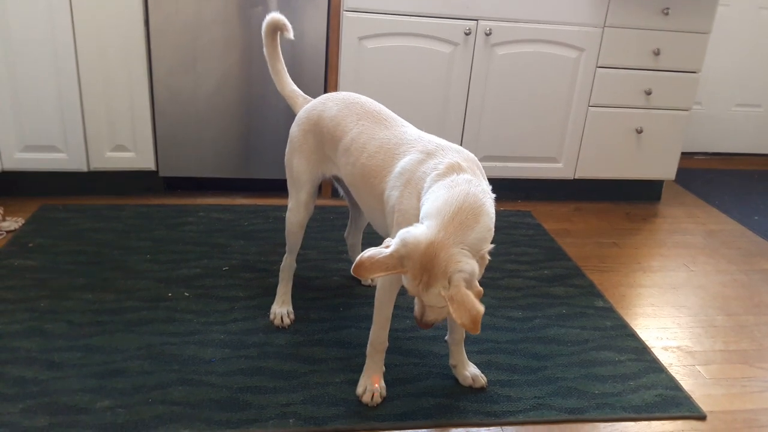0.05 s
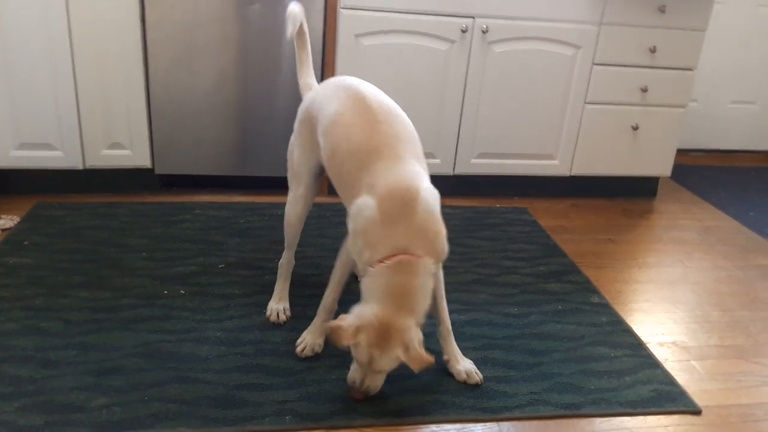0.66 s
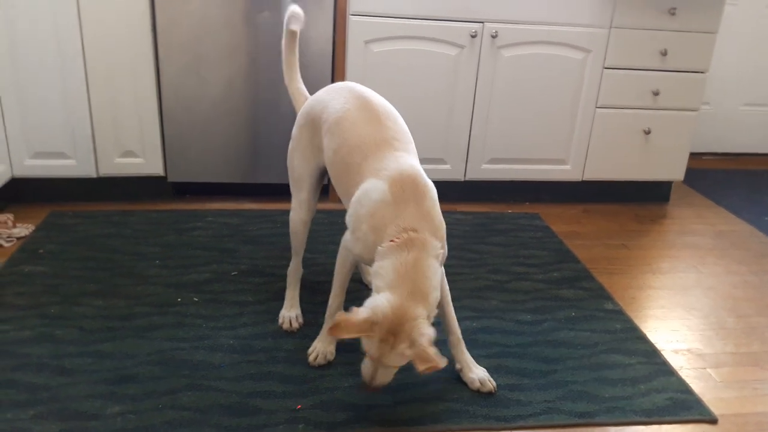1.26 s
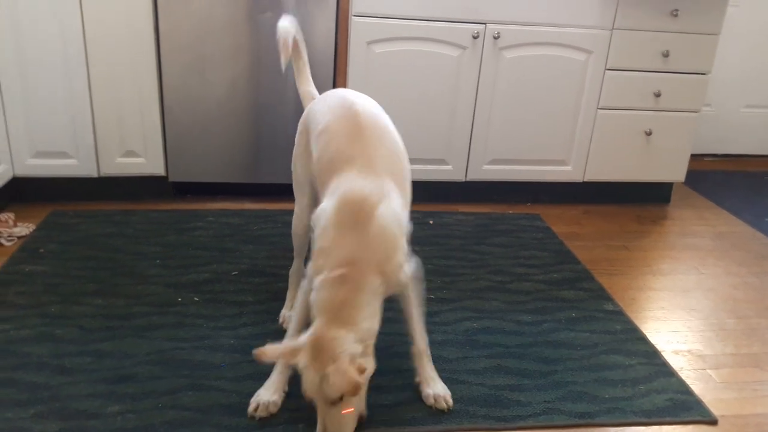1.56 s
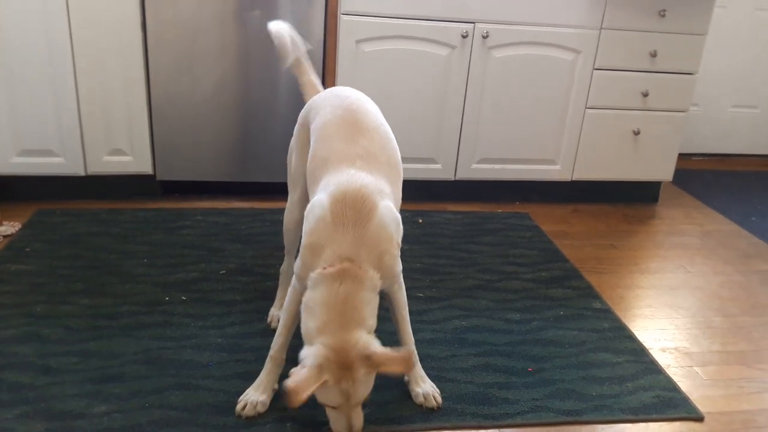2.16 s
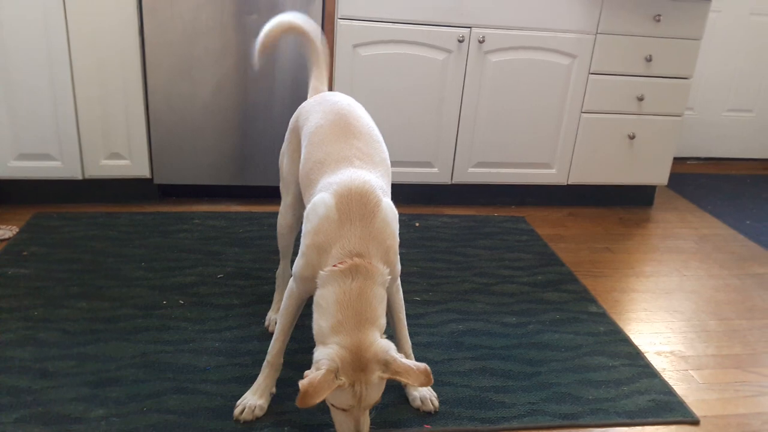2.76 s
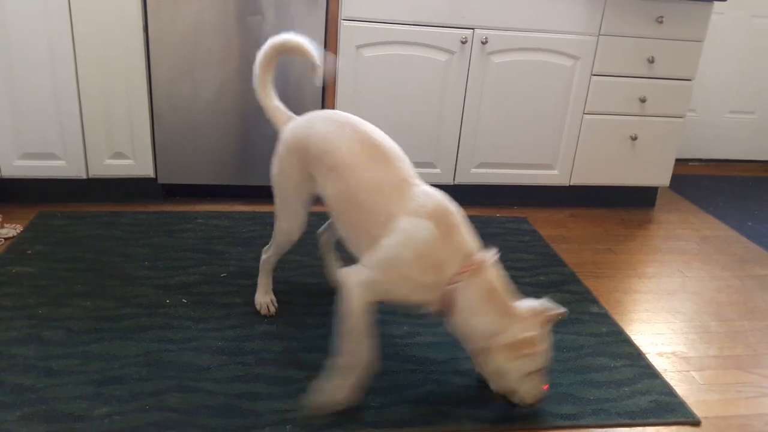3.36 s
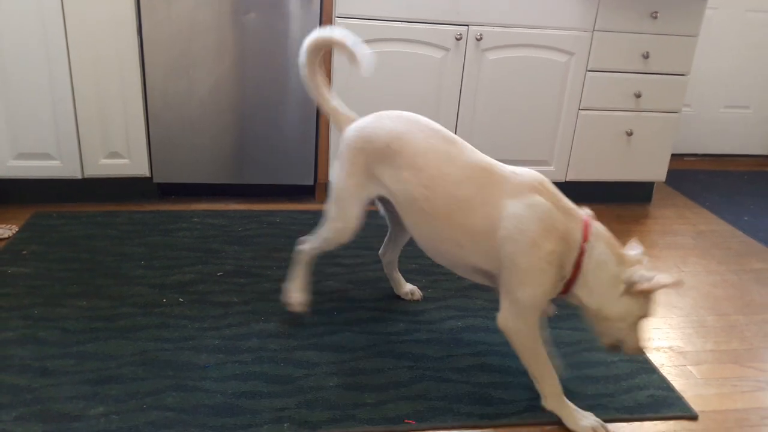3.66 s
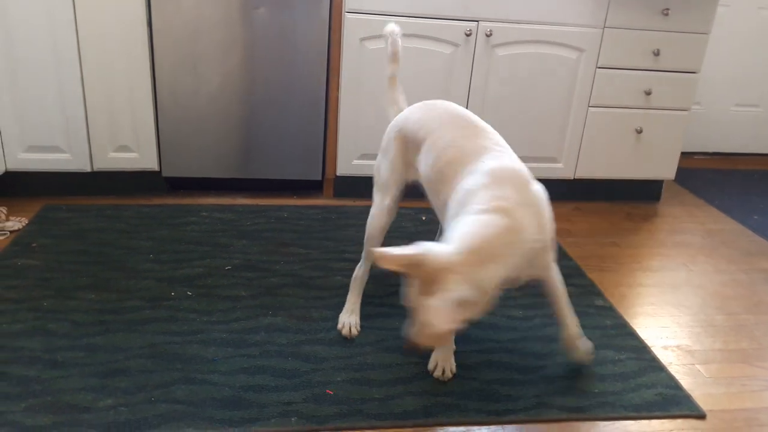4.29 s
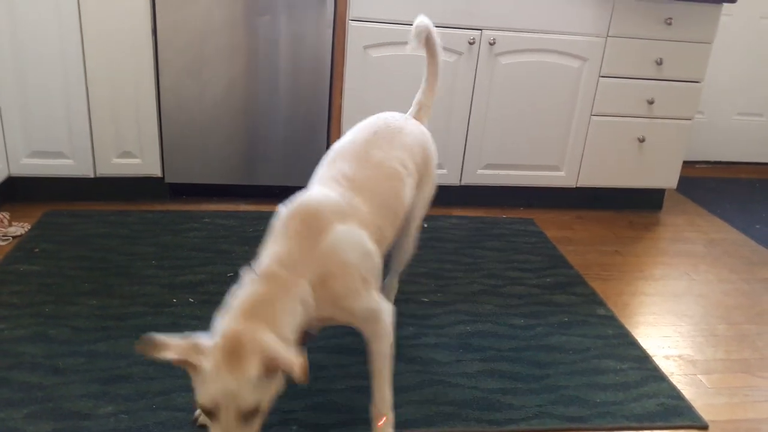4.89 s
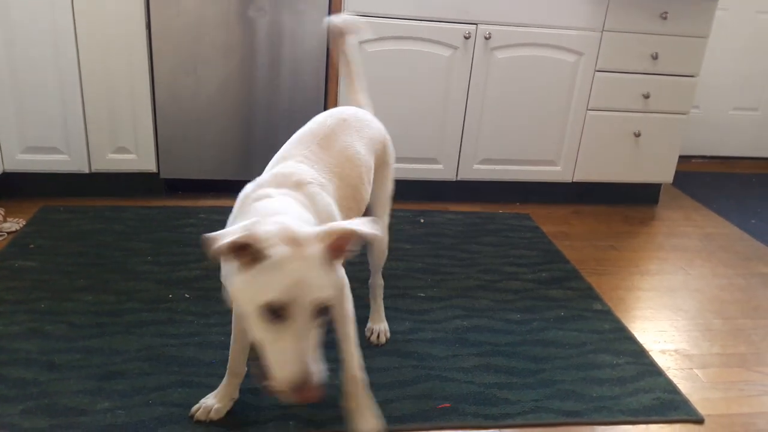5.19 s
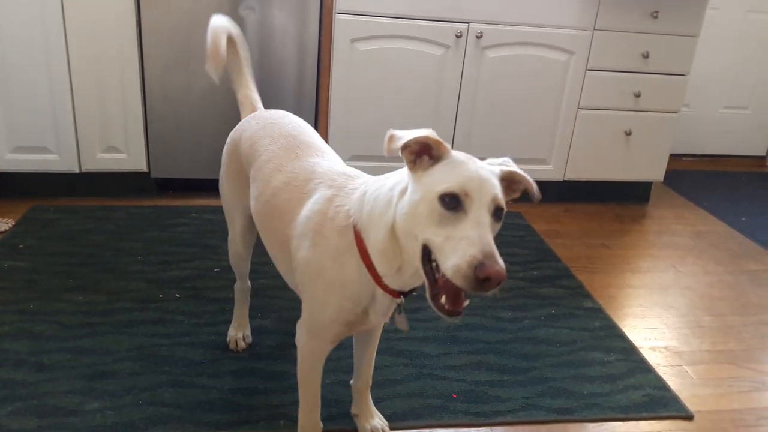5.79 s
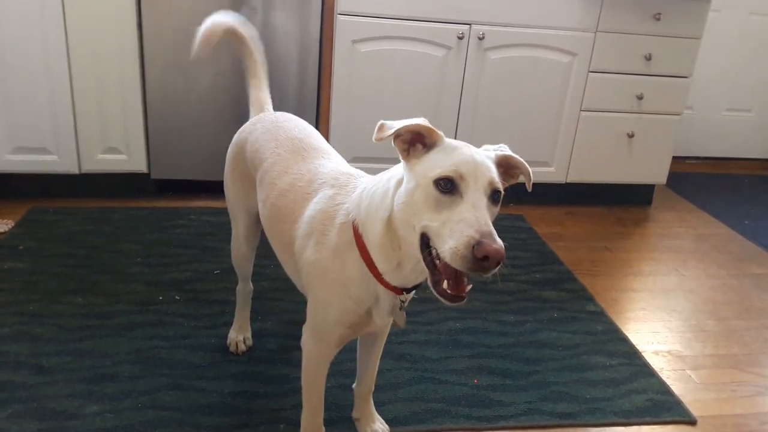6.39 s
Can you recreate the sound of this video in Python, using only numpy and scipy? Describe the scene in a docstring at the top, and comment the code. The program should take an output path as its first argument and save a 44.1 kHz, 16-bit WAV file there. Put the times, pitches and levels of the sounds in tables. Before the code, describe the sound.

A big dog gives two soft, whining woofs and three sharp barks in an echoing kitchen, with paw thumps, skids and claw ticks between.

```python
"""A big dog playing in a kitchen

Two low, whining woofs and three sharp barks: each is one push of breath that buzzes the vocal folds
and rings through the throat. Between them come paw steps, skids, claw ticks, knocks and collar rustles.
Bright crackles and low thumps mark the loudest moments of the last two barks. The hard room rings for
most of a second and a refrigerator hums. The gain control ducks at every bark and creeps back up."""
import sys
import numpy as np
from scipy import signal
from scipy.fft import rfft, irfft
from scipy.io import wavfile
from scipy.ndimage import uniform_filter1d, minimum_filter1d

SR = 44100
rng = np.random.default_rng(int(sys.argv[2]) if len(sys.argv) > 2 else 0)


def file_out(sig):
    """Save sig as 16-bit WAV at sys.argv[1]."""
    # one column per channel
    cols = np.atleast_2d(sig).T
    # limit, then scale
    lim = np.clip(cols, -1, 1)
    pcm = np.round(lim * 32767).astype(np.int16)
    wavfile.write(sys.argv[1], SR, pcm)


N = 284030
TIME = np.arange(N) / SR
CUTOFF_HZ = 15800


def from_db(db):
    """Turn decibels into a number to multiply by."""
    return 10 ** (np.asarray(db) / 20)


def unit_power(x):
    """Scale a sound so that its average power is 1."""
    return x / np.sqrt(np.mean(x ** 2) + 1e-20)


def ramp(x):
    """Keep a share between 0 and 1."""
    return np.clip(x, 0, 1)


def at_hz(points, hz):
    """Read between the rows of a table, giving every octave equal space."""
    points = np.array(points)
    return np.interp(np.log(np.maximum(hz, 1)), np.log(points[:, 0]), points[:, 1])


def colour(x, spectrum, size=2048):
    """Give a sound a tone colour, with a filter that rings only after the sound (minimum phase)."""
    gains = from_db(at_hz(spectrum, np.arange(size // 2 + 1) * SR / size))
    cepstrum = irfft(np.log(gains))
    cepstrum[1:size // 2] *= 2
    cepstrum[size // 2 + 1:] = 0
    response = irfft(np.exp(rfft(cepstrum)))
    return signal.fftconvolve(x, response)[:len(x)]


def noise(spectrum, size):
    """Noise with the given tone colour and a power of 1."""
    return unit_power(colour(rng.standard_normal(size), spectrum))


def wobble(t, per_s):
    """A random wander that glides to per_s new values a second."""
    return np.interp((t - t[0]) * per_s, np.arange(2000), rng.standard_normal(2000))


def swell(t, rise_s, decay_s):
    """A burst builds up to its peak at t = 0 and dies away."""
    below_peak = np.where(t < 0, (t / rise_s) ** 2, t / decay_s)
    return np.exp(-np.minimum(below_peak, 40))


def add(track, start_s, sound):
    """Mix a sound into a track."""
    start = max(int(start_s * SR), 0)
    track[start:start + len(sound)] += sound[:N - start]


def place(x, pan_db, lag_ms):
    """Set the left-right balance: pan_db louder on the left, lag_ms later on the right."""
    delayed = np.interp(TIME - lag_ms / 1000, TIME, x)
    return np.array([x * from_db(pan_db / 2), delayed * from_db(-pan_db / 2)])


# The refrigerator's motor tones. Each row: frequency in Hz, level in dB.
MOTOR_TONES = [(93, -72), (140, -79.5), (253, -71.5), (309, -85), (419, -74.5), (728, -83), (2154, -78),
               (2201, -88.5)]
# The tone colour of its fan. Each row: frequency in Hz, relative level in dB.
FAN_COLOUR = [(18, -66), (30, -30), (87, -10), (167, -9), (253, -3), (426, -14), (597, -17), (716, -16),
              (1240, -24), (1480, -23), (1830, -38.5), (2190, -24), (2490, -36.5), (7830, -50.5),
              (15000, -49)]


def refrigerator(waver=0.31, fan_db=-62.5, side_db=-8.0):
    """Slightly wavering motor tones over soft fan noise."""
    motor = np.zeros(N)
    for hz, db in MOTOR_TONES:
        tone = np.sqrt(2) * np.sin(2 * np.pi * hz * TIME + waver * wobble(TIME, per_s=4.6))
        motor += from_db(db) * tone * (1 + waver * wobble(TIME, per_s=2))
    middle = noise(FAN_COLOUR, N)
    sides = from_db(side_db) * noise(FAN_COLOUR, N) * [[1], [-1]]
    return place(motor, pan_db=6.5, lag_ms=.05) + from_db(fan_db) * (middle + sides)


# How long the kitchen rings. Each row: frequency in Hz, seconds to fade by 60 dB.
RING_TIMES = [(80, 0.28), (250, 0.66), (500, 0.88), (1200, 0.94), (2000, 0.95), (3200, 0.81), (5500, 0.91),
              (7500, 0.55), (11000, 0.2), (16000, 0.56)]
# The tone colour of its echo. Each row: frequency in Hz, relative level in dB.
ECHO_COLOUR = [(60, -9), (200, -1), (450, -0.5), (1200, -4), (2000, -1), (3500, 2), (6500, 1),
               (15000, -0.5)]
# How alike the echo is on the left and right. Each row: frequency in Hz, likeness from 0 to 1.
ECHO_LIKENESS = [(100, 1), (300, 0.9), (600, 0.6), (1200, 0), (3000, 0)]


def kitchen_echo(gap_s=0.00062, build_s=0.0067, early_db=5.5, early_s=0.054, left_db=3.0):
    """The room's answer to a click: strong first echoes off the cabinets, then a fading tail."""
    size = 65536
    t, hz = np.arange(size) / SR, np.arange(size // 2 + 1) * SR / size
    middle, side = rfft(rng.standard_normal((2, size)))
    alike = ramp(at_hz(ECHO_LIKENESS, hz))
    spectrum = np.sqrt(1 + alike) * middle + np.sqrt(1 - alike) * side * [[1], [-1]]
    spectrum *= from_db(at_hz(ECHO_COLOUR, hz))
    centres_hz = np.geomspace(60, 16000, 14)
    band_number = np.interp(np.log(hz + 1), np.log(centres_hz), np.arange(len(centres_hz)))
    tail = np.zeros((2, size))
    for k, centre_hz in enumerate(centres_hz):   # each band fades at its own speed
        band = irfft(spectrum * ramp(1 - abs(band_number - k)))
        tail += band * from_db(-60 * t / at_hz(RING_TIMES, centre_hz))
    tail *= ramp((t - gap_s) / build_s)
    tail *= from_db(early_db * np.exp(-t / early_s))
    tail /= np.sqrt(np.sum(tail ** 2) / 2)
    return tail * from_db([[left_db / 2], [-left_db / 2]])


# Light ticks of claws and collar tags; those at 1.63 and 4.803 s are the tags. Each row: time in seconds, level
# in dB.
TICKS = [(.54, -68), (.613, -53.5), (1.067, -54.5), (1.63, -35), (2.228, -42.5), (2.331, -45),
         (4.22, -55), (4.803, -50)]
# The tone colour of a tick. Each row: frequency in Hz, relative level in dB.
TICK_COLOUR = [(600, -14), (2000, 0.5), (3500, -5), (6800, 1), (8200, -13.5), (15500, -15)]


def ticks():
    """Claws and collar tags give very short, bright cracks."""
    taps = sum(from_db(db) * swell(TIME - at_s, rise_s=0.00053, decay_s=.003) for at_s, db in TICKS)
    return taps * noise(TICK_COLOUR, N)


# The tones in one knock. Each row: frequency in Hz, relative level in dB, seconds to fade by 60 dB.
KNOCK_TONES = [(655, 2.5, 0.11), (809.5, 2.5, 0.2), (1080, 7, 0.038), (1337, -13, 0.048),
               (1739, -17, 0.033)]
# The muzzle's knocks. Each row: start in seconds, level in dB.
MUZZLE_KNOCKS = [(.706, -38.5), (1.52, -49.5)]


def muzzle_knocks():
    """As the muzzle dives to the floor, a few quickly fading tones make a hollow knock."""
    t, out = TIME[:SR], np.zeros(N)
    ring = sum(from_db(db - 60 * t / fade_s) * np.sin(2 * np.pi * hz * t)
               for hz, db, fade_s in KNOCK_TONES)
    for at_s, knock_db in MUZZLE_KNOCKS:
        add(out, at_s, from_db(knock_db) * ring)
    return out


# Short, bright crackles. Each row: time in seconds, level in dB.
CRACKLES = [(1.054, -71), (1.636, -50), (1.684, -53), (3.202, -60), (3.432, -25), (4.812, -53),
            (4.919, -15)]
# Their tone colour. Each row: frequency in Hz, relative level in dB.
CRACKLE_COLOUR = [(4000, -17.5), (6600, 3.5), (7500, 0), (8200, -6.5), (9200, 1.5), (11000, -3),
                  (12500, 2.5), (15000, 1)]


def crackles(grain_db=4.0):
    """Thin, grainy noise: faint collar rustles, and a bright crackle at each of the last two barks."""
    bursts = sum(from_db(db) * swell(TIME - at_s, rise_s=.009, decay_s=.023) for at_s, db in CRACKLES)
    return bursts * noise(CRACKLE_COLOUR, N) * from_db(grain_db * wobble(TIME, per_s=910))


# Low thumps: paw steps, and the loudest moments of the last two barks.
# Each row: time in seconds, level in dB, pitch in Hz, rise in seconds.
THUMPS = [(.68, -48, 201, 0.028), (0.792, -45, 110, 0.045), (0.957, -47, 150, .008),
          (1.631, -27.5, 241.6, .009), (1.65, -27.5, 120, 0.0038), (2.221, -26, 151.4, 0.02),
          (3.396, -15, 131, 0.0062), (3.738, -3, 222.3, 0.035), (3.902, -27, 148.1, 0.015),
          (4.24, -39, 218, 0.021), (4.81, -27, 251.4, 0.0081), (4.834, -26, 170, .004),
          (4.917, -1.5, 228, 0.017), (5.408, -34, 167, 0.043)]
# How a thump spreads around its pitch. Each row: multiple of that pitch, relative level in dB.
THUMP_COLOUR = [(.12, -22.5), (.3, -8), (.5, -4.5), (.75, -10), (1, 5.5), (1.3, -4), (2.2, -15.5), (5, -16),
                (12, -54.5)]
# Scuffing sounds: skids on the rug, and a harsh burst at the loudest moment of the last bark.
# Each row: time in seconds, level in dB, rise in seconds, decay in seconds.
SCUFFS = [(.674, -50.5, 0.016, 0.1), (1.065, -61.5, .025, .11), (1.485, -55.5, 0.027, 0.29),
          (1.605, -43.5, 0.0084, .04), (3.07, -59.5, 0.033, 0.023), (3.344, -35.5, 0.023, 0.01),
          (3.789, -12.5, 0.017, .023), (4.775, -51, 0.027, .046), (4.918, 9, .013, .011),
          (5.408, -29.5, 0.049, 0.035)]
# The tone colour of a scuff. Each row: frequency in Hz, relative level in dB.
SCUFF_COLOUR = [(200, -14), (500, -5.5), (800, 8.5), (1300, -1), (2000, -2.5), (3000, -8), (4500, -19.5),
                (6800, -12), (8200, -34.5), (15500, -34)]


def thumps_and_scuffs(thump_decay_s=.025, brush_db=-20):
    """A thump is a burst of low noise with a soft brushing sound; a scuff is the brushing alone."""
    out = np.zeros(N)
    t = np.arange(SR) / SR - .5   # one second, with the peak of the burst in the middle
    for at_s, thump_db, thump_hz, rise_s in THUMPS:
        thump = noise([(multiple * thump_hz, db) for multiple, db in THUMP_COLOUR], SR)
        brush = from_db(brush_db) * noise(SCUFF_COLOUR, SR)
        add(out, at_s + t[0], from_db(thump_db) * (thump + brush) * swell(t, rise_s, thump_decay_s))
    for at_s, scuff_db, rise_s, decay_s in SCUFFS:
        add(out, at_s + t[0], from_db(scuff_db) * noise(SCUFF_COLOUR, SR) * swell(t, rise_s, decay_s))
    return out


def breath(row, push_db_per_s=30.5, release_db=15, settle_s=0.0086, break_s=.005):
    """One push of breath: the pitch scoops up, glides, then drops; the level swells and lets go."""
    (start_s, rise_s, hold_s, fall_s, pitch_hz, scoop, climb, drop,
     top_db, swell_db, attack_s, release_s, start_rough, fall_rough, jaw_db, air_db) = row
    held_until = rise_s + hold_s
    length_s = held_until + fall_s
    t = np.arange(0, length_s, 1 / SR)
    falling = ramp((t - held_until) / fall_s)
    slide = np.sin(np.pi * falling / 2) ** 2   # the pitch drops fastest midway and lands on a low note
    octaves = -scoop * ramp(1 - t / rise_s) + climb * np.clip(t - rise_s, 0, hold_s) - drop * slide
    level_db = top_db - push_db_per_s * (length_s - t)   # the dog presses harder as the call goes on
    level_db -= swell_db * ramp(1 - t / attack_s)
    level_db -= release_db * ramp(1 - (length_s - t) / release_s) ** 1.1
    # The folds settle into a cleaner tone at full breath, then the voice breaks as the pitch lets go.
    hoarse = start_rough * np.maximum(ramp((attack_s - t) / settle_s), 0.18)
    broken = fall_rough * ramp((t - held_until) / break_s) * ramp(1 - 1.05 * falling)
    rough = ramp(.03 + hoarse + broken)
    mouth_db = 5.5 - jaw_db * (1 - np.sin(np.pi * t / length_s))
    # The voice turns to air as the pitch falls; slack folds at either end also leak more air.
    hiss_db = air_db + 16.5 * falling + 0.26 * (top_db - level_db)
    return start_s + t, pitch_hz * 2 ** octaves, level_db, rough, mouth_db, hiss_db


# The tone colour of the dog's hissing breath. Each row: frequency in Hz, relative level in dB.
BREATH_COLOUR = [(1800, -23.5), (3000, -0.5), (4000, -6.5), (5200, 3.5), (6800, 2), (7600, -9.5),
                 (8200, -26.5), (10000, -20), (15500, -20.5)]


def dog_call(row, throat, pitch_shake=.045, level_shake=0.11, doubling=.8, mouth_hz=950):
    """Vocal-fold pulses ring through the throat; roughness shakes them and adds puffs of air."""
    t, pitch_hz, level_db, rough, mouth_db, hiss_db = breath(row)
    shaken_hz = pitch_hz * (1 + pitch_shake * rough * wobble(t, per_s=350))
    phase = 2 * np.pi * np.cumsum(shaken_hz) / SR
    pulses = unit_power(sum(np.cos(k * phase) * (k * pitch_hz < CUTOFF_HZ) for k in range(1, 48)))
    strong_weak = doubling * rough * np.cos(phase / 2)   # rough folds alternate strong and weak cycles
    pulses *= 1 + strong_weak + level_shake * rough * wobble(t, per_s=190)
    opening = 1 + 0.5 * np.cos(phase)   # more air rushes through while the folds are open
    air = rng.standard_normal(SR)[:len(t)]
    voice = colour(pulses + rough * opening * air, throat)
    chest = signal.sosfiltfilt(signal.butter(2, mouth_hz, fs=SR, output="sos"), voice)
    voice = chest + from_db(mouth_db) * (voice - chest)   # a wider mouth lets out more overtones
    power = uniform_filter1d(voice ** 2, size=400)
    voice /= np.sqrt(np.maximum(power, 1e-12))   # even it out, so the breath sets the loudness
    hiss = from_db(hiss_db) * opening * noise(BREATH_COLOUR, SR)[:len(t)]
    fade = ramp(np.minimum(t - t[0], t[-1] - t) / 0.0078)
    out = np.zeros(N)
    add(out, t[0], (voice + hiss) * from_db(level_db) * fade)
    return out


# How the throat and mouth colour each call. Each row: frequency in Hz, relative level in dB.
WOOF_1_THROAT = [(150, 5), (290, 6), (440, -11), (600, -3), (890, 3.5), (1200, -15), (1500, -25.5),
                 (1820, -14.5), (2150, -24.5), (2750, -32.5), (3200, -49.5), (4100, -31), (4800, -41.5),
                 (5400, -40.5), (6500, -52), (8000, -81)]
BARK_1_THROAT = [(200, -9.5), (350, -1.5), (620, 7), (780, 6.5), (950, -4.5), (1080, 6.5), (1250, -13.5),
                 (1530, -8.5), (1880, -10), (2150, -12.5), (2500, -23.5), (3100, -38), (4500, -47.5),
                 (6200, -42), (8000, -79)]
WOOF_2_THROAT = [(200, 2), (340, -1.5), (690, 3.5), (1030, 1.5), (1380, -17.5), (1740, -3.5), (2100, -13),
                 (2450, -24), (2800, -42), (3500, -52.5), (4300, -34.5), (5200, -36.5), (6500, -46),
                 (8000, -65.5)]
BARK_2_THROAT = [(200, -14), (430, 5.5), (720, -0.5), (1050, 6.5), (1350, 2), (1600, 0.5), (1980, 2),
                 (2250, -16.5), (3100, -39.5), (6200, -34), (8000, -62)]
BARK_3_THROAT = [(200, -47.5), (400, -3), (600, 0), (850, -3.5), (1200, 4), (1500, -5), (1850, -3.5),
                 (2200, -13), (3100, -38.5), (5200, -31), (8000, -52.5)]
# The five calls. Each row: start, rise, hold and fall in seconds, pitch in Hz, scoop up in octaves,
# climb while held in octaves per second, drop in octaves, level and swell in dB, attack and release
# in seconds, roughness at the start and in the fall from 0 to 1, jaw swing in dB,
# base level of the hiss in dB compared with the voice.
WOOFS_AND_BARKS = [(.819, 0.051, .055, 0.048, 308.5, .15, -1.5, .36, -29.5, 20, .018, 0.038, 0.42, .2, 13, -44),
                   (1.667, .039, 0.057, .036, 605.3, 1.5, 1.5, 0.44, 16, 41, 0.049, 0.046, 0.32, 0.54, -3, -44),
                   (3.112, .043, 0.077, 0.015, 328.1, .38, 1.81, 0.38, -21.5, 25, .046, 0.021, 0.06, 0.08, 25, -43),
                   (3.376, .02, .005, .122, 778.8, 0.15, 1.31, 0.85, 14.5, 31.5, 0.0049, 0.022, 0.04, 0.65, 21.5, -40),
                   (4.823, .04, .07, .05, 541, .85, 3.5, .62, 16.5, 47, .06, 0.032, 0.77, 0.19, 7.5, -40)]


def dog_voice():
    """Five calls, each with its own throat shape, left-right balance and share of echo."""
    woof_1, bark_1, woof_2, bark_2, bark_3 = WOOFS_AND_BARKS
    # Each row: sound, dB louder on the left, milliseconds later on the right, dB sent into the room.
    return [(dog_call(woof_1, WOOF_1_THROAT), 4.0, 0.059, -1.0),
            (dog_call(bark_1, BARK_1_THROAT), 7.0, 0.069, 4.0),
            (dog_call(woof_2, WOOF_2_THROAT), 1.5, 0.12, 3.5),
            (dog_call(bark_2, BARK_2_THROAT), 6.5, -0.04, 4.5),
            (dog_call(bark_3, BARK_3_THROAT), 1.5, 0.13, 9.0)]


def scene():
    """The calls and short noises arrive directly and as kitchen echo, over the refrigerator."""
    calls = dog_voice()
    noises = thumps_and_scuffs() + ticks() + muzzle_knocks() + crackles()
    direct = place(noises, pan_db=3.0, lag_ms=0.035)
    into_room = from_db(-3.0) * noises
    for call, pan_db, lag_ms, room_db in calls:
        direct += place(call, pan_db, lag_ms)
        into_room += from_db(room_db) * call
    echo = signal.fftconvolve(into_room[None], kitchen_echo(), axes=1)[:, :N]
    return direct + echo + refrigerator()


def gain_control(x, ceiling_db=-10.0, peak_limit=.88, release_db_per_s=17.5):
    """Watches power and peaks a few milliseconds ahead, turns down at once and recovers slowly."""
    power = uniform_filter1d(np.mean(x ** 2, axis=0), size=300)
    power_over_db = 10 * np.log10(np.maximum(power, 1e-12)) - ceiling_db
    peak_over_db = 20 * np.log10(np.maximum(abs(x).max(axis=0), 1e-6) / peak_limit)
    excess_db = np.maximum(np.maximum(power_over_db, peak_over_db), 0)
    recovery_db = release_db_per_s * TIME
    cut_db = np.maximum.accumulate(excess_db + recovery_db) - recovery_db
    gain_db = minimum_filter1d(-cut_db, size=400)   # start turning down just before the loud sound
    return x * from_db(uniform_filter1d(gain_db, size=400))


def record(dry, hiss_db=-90.5, low_cut_hz=55):
    """A small microphone: no deep bass, gain control, faint electronic hiss and a steep treble cut."""
    picked_up = signal.sosfilt(signal.butter(4, low_cut_hz, "high", fs=SR, output="sos"), dry)
    out = gain_control(picked_up) + from_db(hiss_db) * rng.standard_normal((2, N))
    return signal.sosfilt(signal.ellip(10, .1, 80, CUTOFF_HZ, fs=SR, output="sos"), out)


dry = scene()
out = record(dry)
file_out(out)
```